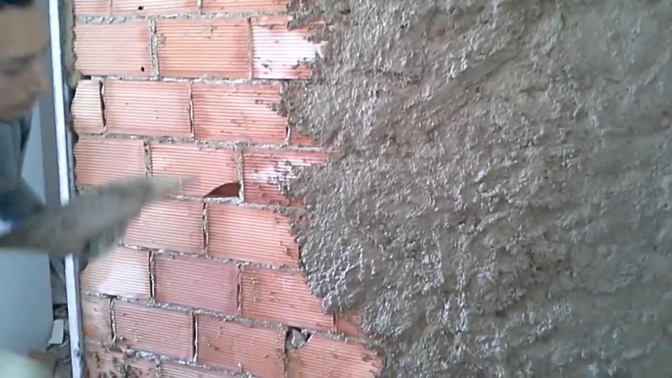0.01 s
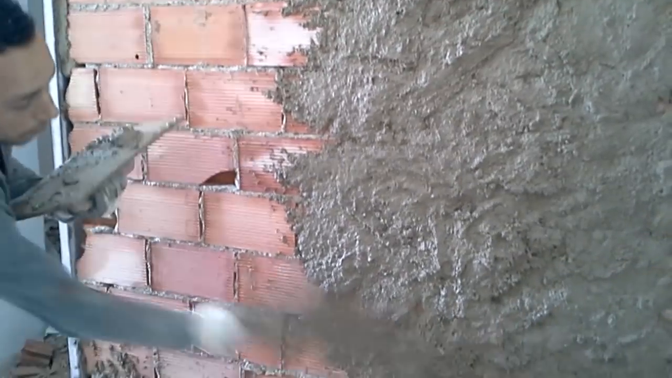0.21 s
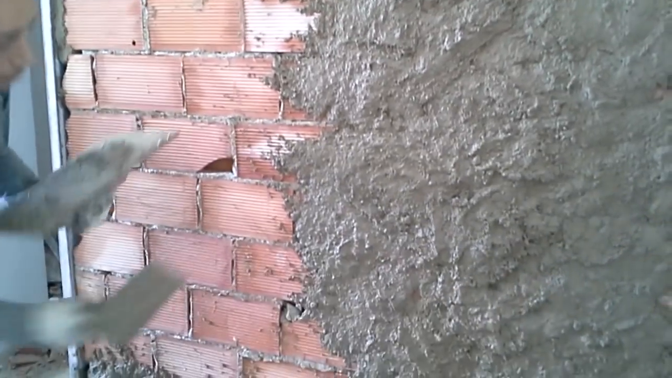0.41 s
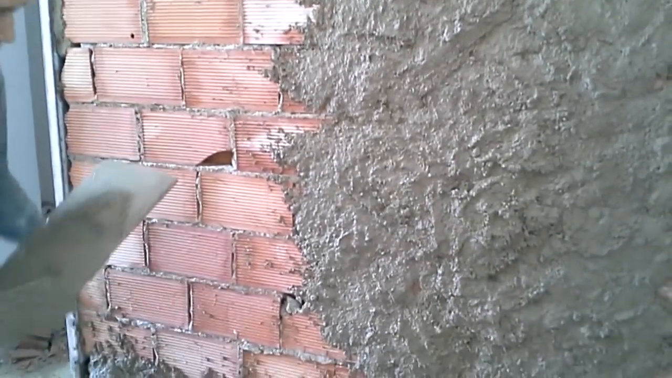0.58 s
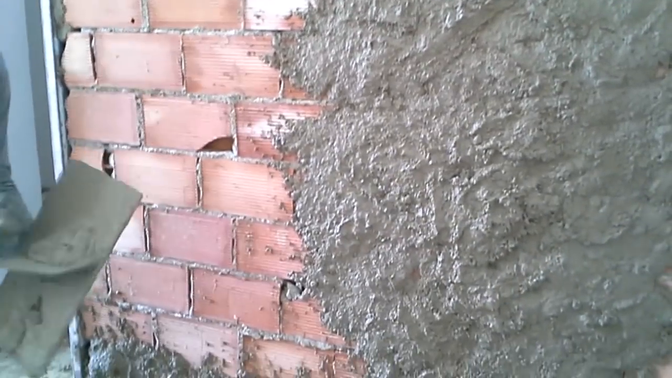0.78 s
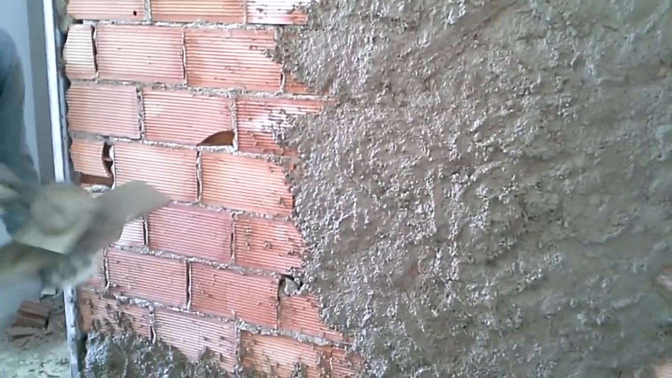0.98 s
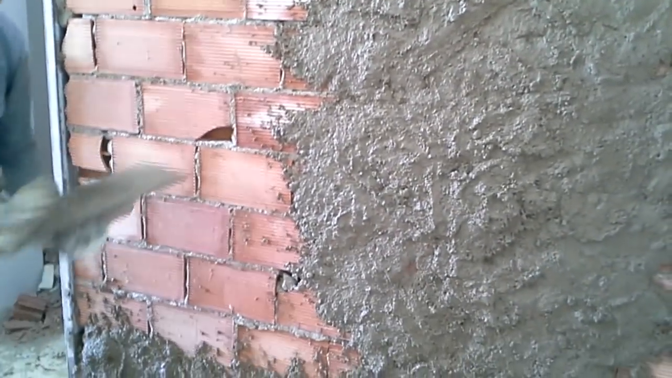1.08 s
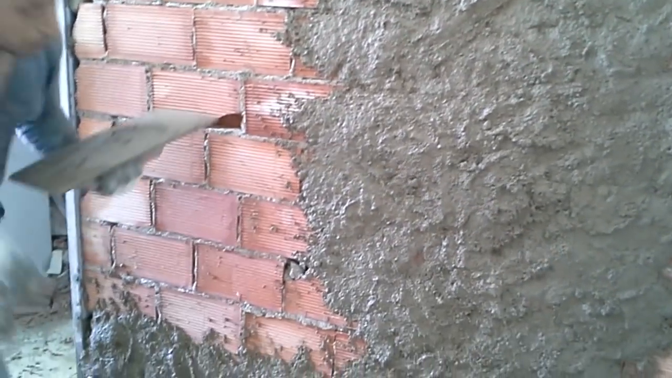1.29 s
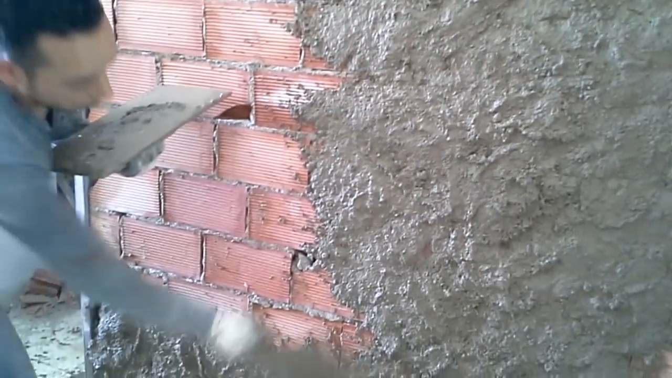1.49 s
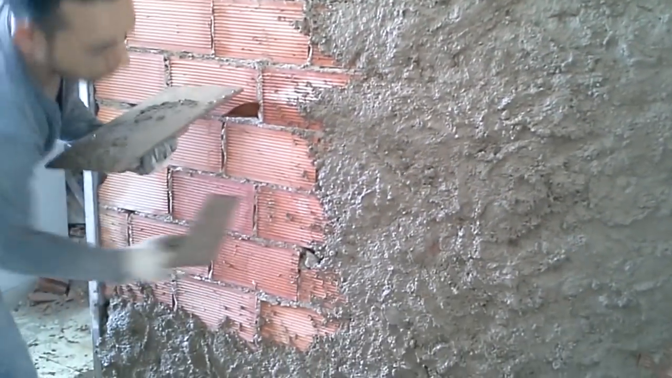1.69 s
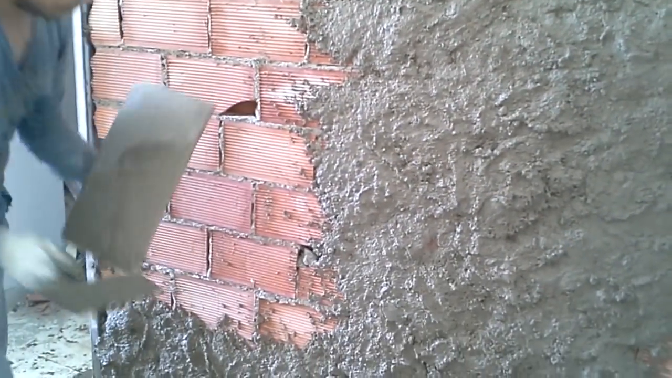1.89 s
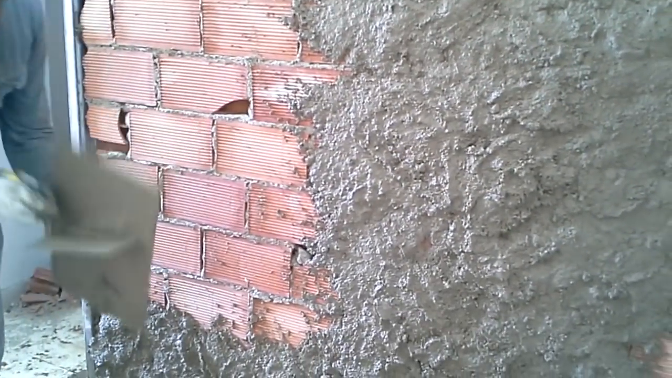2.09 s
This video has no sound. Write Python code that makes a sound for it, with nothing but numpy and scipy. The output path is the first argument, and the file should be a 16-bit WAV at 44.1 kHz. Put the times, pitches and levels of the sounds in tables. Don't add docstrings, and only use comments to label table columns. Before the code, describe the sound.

Wet cement slaps onto brick at 1.04 s, after a short swish, with a low wall thump, hollow ring and smaller wet spatters until about 1.3 s. Before it, an earlier throw's echo fades, feet scuff, and a trowel knocks and grinds on a board at 0.2-0.33 s; a crumb drops at 0.74. A longer scoop scrapes from 1.53 to 1.87, rising in pitch. Sand trickles; faint hum, bare-room echo.

```python
import sys
import numpy as np
from scipy import signal
from scipy.fft import rfft, irfft, next_fast_len
from scipy.io import wavfile
from scipy.ndimage import uniform_filter1d

SR = 44100
rng = np.random.default_rng(int(sys.argv[2]) if len(sys.argv) > 2 else 0)


def master(y):
    cut = np.clip(np.atleast_2d(y).T, -1, 1)
    pcm = np.round(cut * 32767)
    wavfile.write(sys.argv[1], SR, pcm.astype(np.int16))


def amplitude_ratio(level_db):
    exponent = np.asarray(level_db, float) / 20
    return 10 ** exponent


N = 92610
SIZE = next_fast_len(3 * N // 2)
HZ = np.maximum(np.arange(SIZE // 2 + 1) * SR / SIZE, 1)
T = np.arange(N) / SR
ROOM_DB, NEAR_DB = -4, -7


def on_hz(table):
    a = np.array(table, float)
    return np.interp(np.log(HZ), np.log(np.maximum(a[:, 0], 1)), a[:, 1])


def shape(x, gain):
    return irfft(rfft(x, SIZE) * gain, SIZE)[..., :N]


def low_cut(x, cut_hz):
    return signal.sosfilt(signal.butter(4, cut_hz, "high", fs=SR, output="sos"), x)


def unit(x):
    return x / np.sqrt(np.mean(x ** 2))


def modes(table):
    h = 0
    for k, (hz, width_hz, level_db) in enumerate(table):
        h = h + (-1) ** k * amplitude_ratio(level_db) / (1 + 1j * (HZ - hz ** 2 / HZ) / max(width_hz, 5))
    return h / np.sqrt(np.mean(abs(h) ** 2))


def colour(table):
    cepstrum = irfft(np.log(amplitude_ratio(on_hz(table))), SIZE)
    cepstrum[1:SIZE // 2] *= 2
    cepstrum[SIZE // 2 + 1:] = 0
    h = np.exp(rfft(cepstrum))
    return h / np.sqrt(np.mean(abs(h) ** 2))


def curve(table, col=1):
    a = np.array(table, float)
    return amplitude_ratio(np.interp(T, a[:, 0], a[:, col], -120, -120))


def grains(scatter_db):
    return unit(rng.standard_normal(N) * amplitude_ratio(scatter_db * rng.exponential(size=N)))


def flicker(rate_hz, depth_db):
    k = int(SR / rate_hz)
    steps = np.repeat(rng.standard_normal(N)[:N // k + 1], k)
    return amplitude_ratio(depth_db * uniform_filter1d(steps, k)[:N])


def burst(start_s, level_db, fade_s):
    return amplitude_ratio(level_db) * (T >= start_s) * np.exp(-np.maximum(T - start_s, 0) / fade_s)


# pitch_hz, common_share
ALIKE = [(150, 0.87), (400, 0.88), (900, 0.41), (2000, 0.018)]


def wide(gain, force=1, scatter_db=0):
    common = np.clip(on_hz(ALIKE), 0, 1)
    mid = force * grains(scatter_db)
    side = force * grains(scatter_db)
    return shape(mid, gain * np.sqrt(1 + common)) + shape(side, gain * np.sqrt(1 - common)) * np.array([[1], [-1]])


# pitch_hz, level_db
SITE = [(24, -17), (40, -14), (189, -9.5), (483, -8.5), (520, -9.5), (588, -6), (1430, -10), (5820, -18),
        (14500, -27.5)]


def site_hum():
    return amplitude_ratio(-55.5) * wide(colour(SITE)) * flicker(8, 1.5)


# pitch_hz, level_db
EARLIER = [(35, -43), (60, -6), (161, -7), (286, -20.5), (684, -9.5), (965, -19.5), (1190, -14),
           (2210, -15.5), (14500, -37.5)]


def earlier_ring():
    t60_s = 0.66
    return wide(colour(EARLIER)) * amplitude_ratio(-39 - 60 * T / t60_s)


# pitch_hz, level_db
TRICKLE = [(600, -13.5), (1500, -16.5), (3000, -15), (4300, -13), (5000, -9.5), (5700, -15), (8000, -21.5),
           (14500, -34)]
# start_s, level_db
TRICKLE_DB = [(0, -52), (.1, -66), (.128, -42), (.14, -53), (.156, -40.5), (.165, -46), (.19, -41.5),
              (.4, -48), (.6, -55.5), (.8, -48.5), (.9, -61), (1.3, -49), (1.5, -63.5), (1.95, -50),
              (2.04, -51.5), (2.1, -43.5)]


def sand_trickle():
    return shape(curve(TRICKLE_DB) * grains(2.8) * flicker(43.0, 0.32), colour(TRICKLE))


# start_s, level_db
SHUFFLES = [
    (0.045, -35.5),
    (0.085, -40),
    (.12, -64),
]
# pitch_hz, level_db
DULL_BODY = [(100, -41), (220, -4.5), (700, -4), (1500, -6.5), (3000, -15.5), (7000, -38)]


def foot_shuffles():
    scuffs = sum(burst(start_s, level_db, 0.0063) for start_s, level_db in SHUFFLES)
    return shape(scuffs * grains(3.8), colour(DULL_BODY))


# start_s, knock_db, grit_db
SCOOP_1 = [
    (.198, -28, -65),
    (.201, -13.5, -26),
    (.211, -11.5, -24.5),
    (.225, -15, -22),
    (.255, -15, -15.5),
    (.275, -18, -16),
    (.29, -59, -19),
    (.33, -74, -24.5),
]
# start_s, knock_db, grit_db
SCOOP_2 = [
    (1.531, -21, -54),
    (1.534, -13, -23.5),
    (1.569, -17, -23.5),
    (1.574, -17.5, -13.5),
    (1.64, -20, -15),
    (1.7, -28, -15),
    (1.775, -14.5, -22),
    (1.81, -14.5, -34.5),
    (1.87, -29, -44),
]
# start_s, peak_db, pitch_hz
JOLTS = [
    (0.202, -13, 550),
    (0.2096, -7, 593),
    (.227, -12.5, 630),
    (0.248, -3, 940),
    (0.2532, -1.5, 771),
    (0.2595, -4.5, 750),
    (1.5335, -12, 333),
    (1.546, -11.5, 557),
    (1.5727, 0, 815),
    (1.587, -10.5, 800),
]
# pitch_hz, width_hz, level_db
BOARD_1 = [(154, 11, -29), (266, 15, -5), (301.5, 48, -14.5), (474, 16, -7), (634.8, 11, 4), (764, 20, 2),
           (917, 7.8, 2.5), (1128, 10, -2), (1501, 61, -4.5), (2140, 56, -16), (2955, 57, -8),
           (3620, 52, -18), (4210, 31, -15), (4660, 35, -16)]
# pitch_hz, width_hz, level_db
BOARD_2 = [(335, 47, -7.5), (368, 28, 0.5), (557, 25, -8), (631, 12.6, -1.5), (787, 39, -3.5),
           (928, 71, -1), (1496, 77, -8.5), (2060, 20, 0.5), (2890, 55, -1.5), (3530, 37, -12),
           (3820, 45, -16), (4450, 29, -23), (5020, 26, -14), (5220, 45, -8)]
BOARD_LOW_HZ = [125, 194]


def board_knocks():
    chatter = grains(2.0) * flicker(150, 2.5)
    jolt_s, loaded_s = 0.00059, 1.65
    jolts, board = 0, 0
    for start_s, peak_db, pitch_hz in JOLTS:
        jolts = jolts + amplitude_ratio(peak_db + 5.5) * np.exp(-((T - start_s - jolt_s) / jolt_s * 4) ** 2)
        board = board + burst(start_s, peak_db, .003) * np.sin(2 * np.pi * pitch_hz * (T - start_s))
    free = np.exp(-np.maximum(T - loaded_s, 0) / .025)
    for scoop, ring, low_hz in zip((SCOOP_1, SCOOP_2), (BOARD_1, BOARD_2), BOARD_LOW_HZ):
        own_jolts = jolts * (abs(T - scoop[0][0]) < .5)
        force = curve(scoop) * chatter + amplitude_ratio(-9.5) * own_jolts
        ringing = shape(force * free, modes(ring))
        body = shape(force, amplitude_ratio(-12) * colour(DULL_BODY))
        board = board + shape(ringing + body, 1 / (1 + low_hz / (1j * HZ)) ** 3)
    return board


# pitch_hz, level_db
GRIT = [(590, -52.5), (1000, -16), (1050, -10.5), (1910, -9.5), (2260, -10.5), (3540, -15), (6000, -16.5),
        (9500, -22.5), (14500, -27.5)]


def grit_grind():
    pressure = curve(SCOOP_1, col=2) + curve(SCOOP_2, col=2)
    return wide(0.61 * colour(GRIT), pressure * flicker(60, 1.77), 1.83)


# start_s, level_db, fade_s
CRUMBS = [
    (0.7369, -31, 0.0023),
    (0.743, -39, 0.016),
    (0.775, -56, .005),
]
# pitch_hz, level_db
DROP = [(500, -21), (1200, -8), (1600, 4), (2600, -3), (3500, 1), (4300, -18), (5200, -6), (14500, -28)]


def crumb_drop():
    return shape(sum(burst(*row) for row in CRUMBS) * grains(1.5), colour(DROP))


# pitch_hz, level_db
SWISH = [(300, -33), (800, -2.5), (1500, -8), (3000, -4), (4300, -5.5), (7000, -6.5), (14500, -18)]
# start_s, level_db
SWISH_DB = [
    (.96, -79),
    (.99, -45),
    (1.01, -33.5),
    (1.04, -34),
    (1.05, -54),
]


def swish():
    return shape(curve(SWISH_DB) * grains(2.2), colour(SWISH))


# start_s, level_db, fade_s, thud_db
LUMPS = [
    (1.04, -7, 0.031, -23),
    (1.059, -16, 0.0058, -27),
    (1.074, -19, 0.02, -25.5),
    (1.092, -17.5, 0.015, -39),
    (1.126, -42, 0.016, -28),
    (1.152, -25, 0.027, -46),
    (1.273, -53, .01, -39),
]
# pitch_hz, level_db
SPLAT = [(120, -15.5), (280, -3.5), (420, -11), (650, -12), (960, -3), (1600, -2.5), (4800, -8.5),
         (7500, -13), (14500, -30)]


def wet_splat():
    wet = sum(burst(start_s, level_db, fade_s) for start_s, level_db, fade_s, _ in LUMPS)
    return wide(colour(SPLAT), .5 * wet, 2.1)


# pitch_hz, width_hz, level_db
BRICK = [(1500, 300, -7), (3300, 250, 0), (3780, 200, -1)]


def brick_ring():
    return wide(modes(BRICK), burst(LUMPS[0][0], -16, .016), 2.4)


# pitch_hz, width_hz, level_db
WALL = [(89.6, 5.2, 1), (120.4, 7.1, -1), (151, 47, -0.5), (195, 16, -18), (264.6, 26, 1), (296, 34, -4.5),
        (400, 9.7, 4), (996, 27, 3.5), (1218, 45, -11)]


def wall_thump():
    push = sum(burst(start_s, thud_db, 0.0064) for start_s, _, _, thud_db in LUMPS)
    return shape(push * (1 + 1.8 * rng.standard_normal(N)), modes(WALL))


# start_s, pitch_hz, level_db
HOLLOW = [
    (1.565, 786.6, -52),
    (1.578, 846.7, -13.5),
    (1.64, 950, -19),
    (1.69, 1109, -26.5),
    (1.79, 1117, -27),
    (1.84, 1194, -61),
]


def blade_hollow():
    a = np.array(HOLLOW, float)
    narrow = 1 / (1 + 1j * HZ / 224) ** 2
    wobble_1, wobble_2 = [unit(shape(grains(0.52), narrow)) for _ in range(2)]
    turn = 2 * np.pi * np.cumsum(np.interp(T, a[:, 0], a[:, 1])) / SR
    return curve(HOLLOW, col=2) * (wobble_1 * np.cos(turn) + wobble_2 * np.sin(turn))


# pitch_hz, level_db
ROOM_TONE = [(60, -6.5), (300, 2.5), (1500, 0.5), (14000, -4)]


def even(tail):
    power = uniform_filter1d(abs(rfft(tail, SIZE)) ** 2, int(150 * SIZE / SR))
    level = np.hypot(amplitude_ratio(ROOM_DB), amplitude_ratio(NEAR_DB))
    return shape(tail, amplitude_ratio(on_hz(ROOM_TONE)) * level / np.sqrt(power))


# pitch_hz, t60_s
ROOM_T60 = [(100, 0.54), (300, 0.68), (700, 0.57), (1500, 0.49), (3000, 0.48), (6000, 0.51), (12000, 0.36)]


def room(sources):
    delay_s, rise_s, near_t60_s = 0.0024, 0.012, 0.021
    a = np.array(ROOM_T60)
    tails = [0, 0, 0]
    late = np.maximum(T - delay_s, 0)
    noise = wide(1)
    close = amplitude_ratio(NEAR_DB - 60 * T / near_t60_s) / np.sqrt(near_t60_s * SR / 14)
    for hz in 60 * 2. ** np.arange(0, 8.5, .5):
        band = shape(noise, np.cos(np.pi * np.clip(np.log2(HZ / hz), -.5, .5)) ** 2)
        t60_s = np.interp(np.log(hz), np.log(a[:, 0]), a[:, 1])
        fade = amplitude_ratio(ROOM_DB - 60 * late / t60_s) / np.sqrt(t60_s * SR / 14)
        fade = fade * (1 - np.exp(-late / rise_s))
        tails = [tail + np.roll(band, k * N // 3, axis=1) * (fade + close) for k, tail in enumerate(tails)]
    return sum(shape(x, rfft(even(tail), SIZE)) for x, tail in zip(sources, tails))


def place(x, lag_s, pan_db):
    side = np.array([[.5], [-.5]])
    return shape(x, amplitude_ratio(side * pan_db) * np.exp(-2j * np.pi * HZ * side * lag_s))


def scene():
    board = low_cut(board_knocks() + grit_grind() + blade_hollow(), BOARD_LOW_HZ[0])
    wall = swish() + wall_thump() + wet_splat() + brick_ring()
    small = crumb_drop() + sand_trickle() + foot_shuffles()
    direct = place(board, lag_s=.0001, pan_db=0)
    direct = direct + place(wall, lag_s=-.00008, pan_db=1.5)
    direct = direct + place(small, lag_s=-.00008, pan_db=-1)
    earlier = earlier_ring()
    return direct + room([board, wall, small]) + earlier + site_hum()


def roll_off(x):
    return signal.sosfilt(signal.butter(12, 14760, fs=SR, output="sos"), x)


# pitch_hz, left_over_right_db
LEFT_OVER_RIGHT = [(60, -12), (110, 1), (200, -3.5), (370, -1), (680, -3.5), (1250, -1), (2290, 3),
                   (4200, 13), (7720, 8), (14200, -1)]


def record(dry):
    x = shape(dry, amplitude_ratio(on_hz(LEFT_OVER_RIGHT) * np.array([[.5], [-.5]])))
    ceiling = 1.15
    x = np.clip(low_cut(x, 106), -ceiling, ceiling)
    x = signal.sosfilt(signal.ellip(10, .2, 70, 14750, fs=SR, output="sos"), x)
    return roll_off(x)


dry = scene()
out = record(dry)
master(out)
```